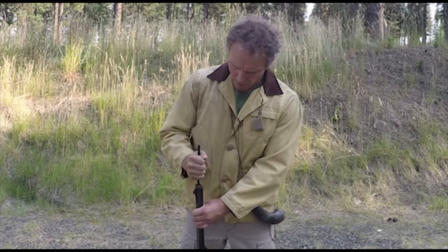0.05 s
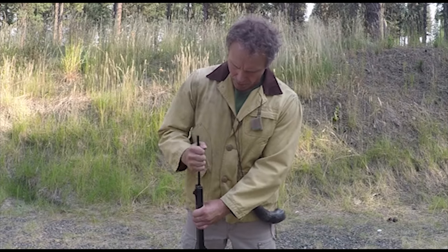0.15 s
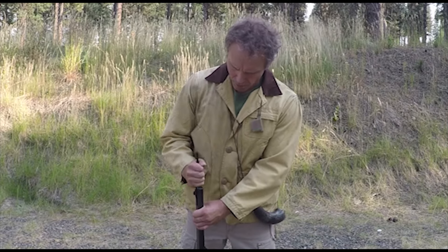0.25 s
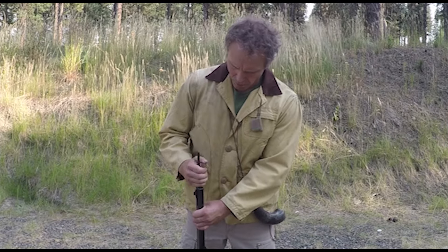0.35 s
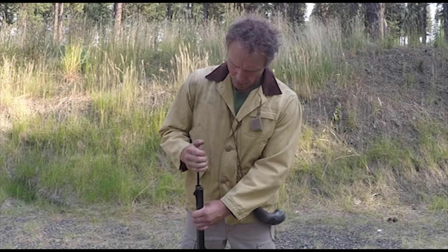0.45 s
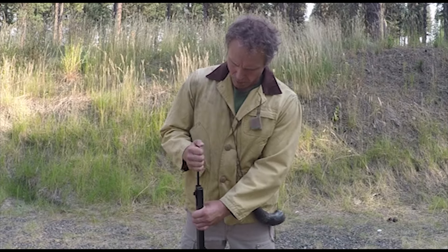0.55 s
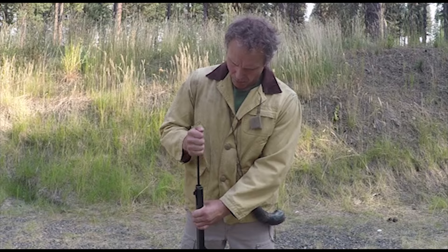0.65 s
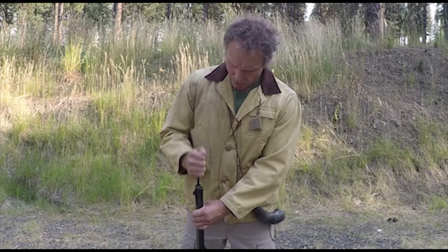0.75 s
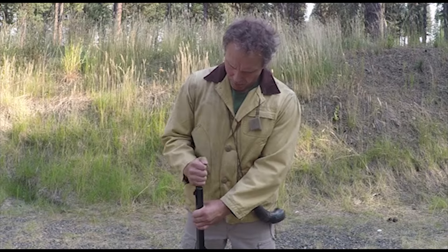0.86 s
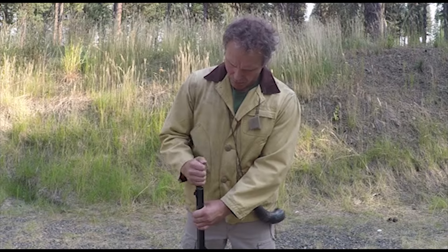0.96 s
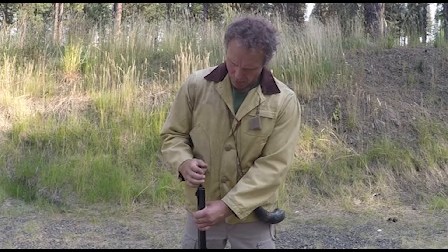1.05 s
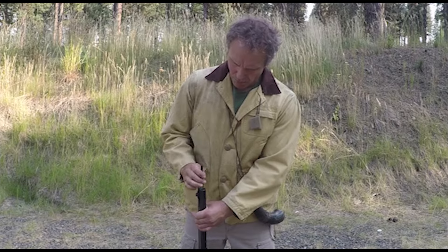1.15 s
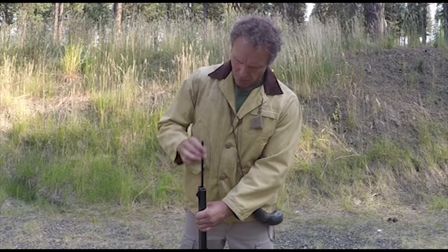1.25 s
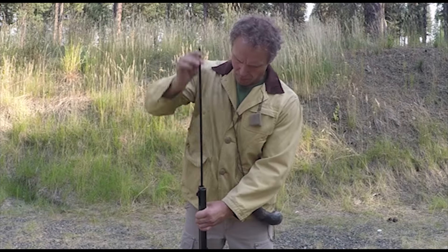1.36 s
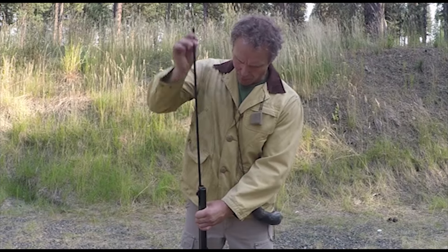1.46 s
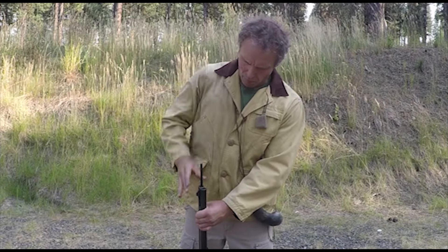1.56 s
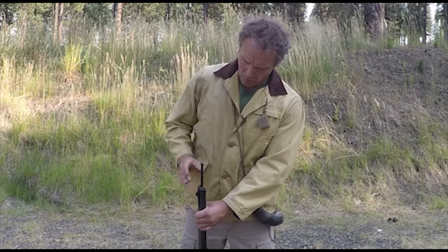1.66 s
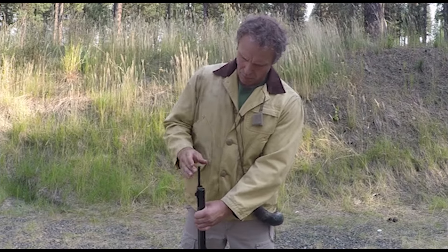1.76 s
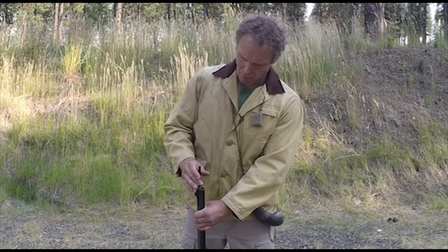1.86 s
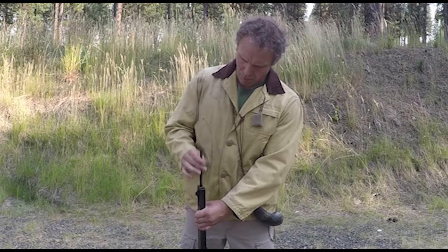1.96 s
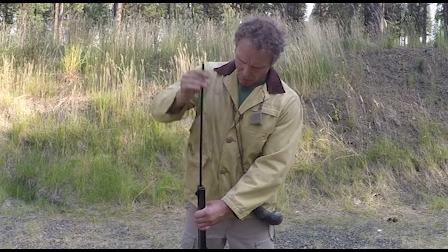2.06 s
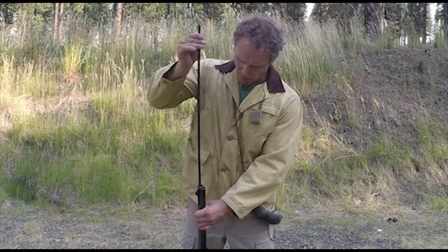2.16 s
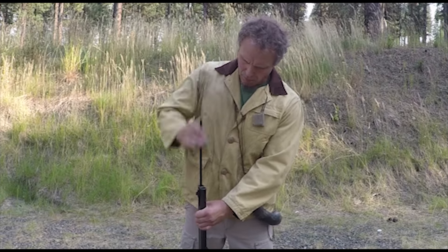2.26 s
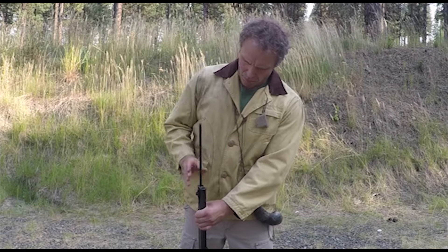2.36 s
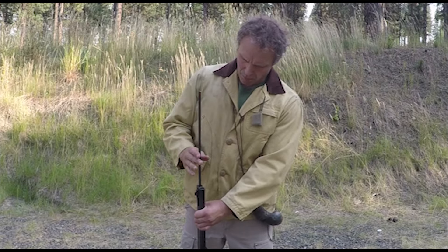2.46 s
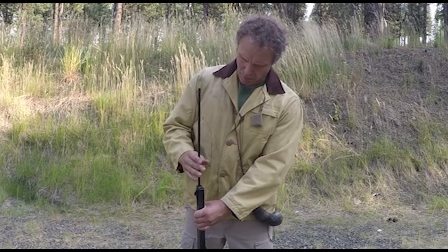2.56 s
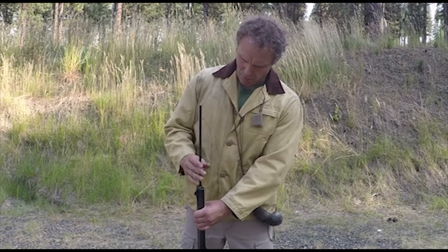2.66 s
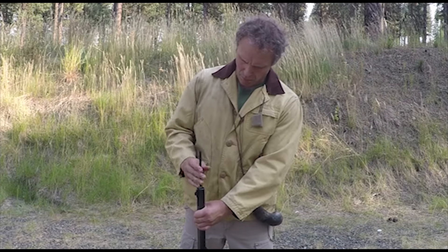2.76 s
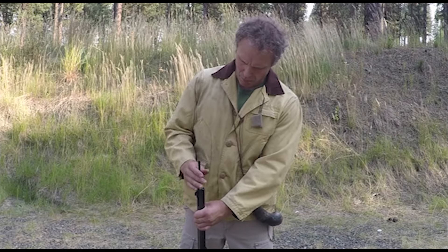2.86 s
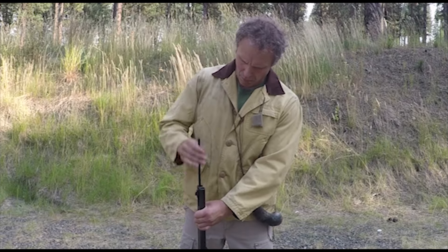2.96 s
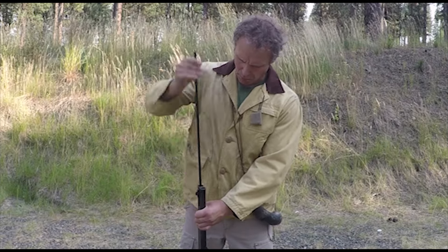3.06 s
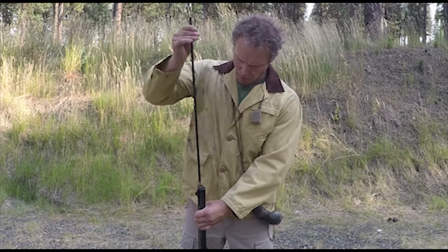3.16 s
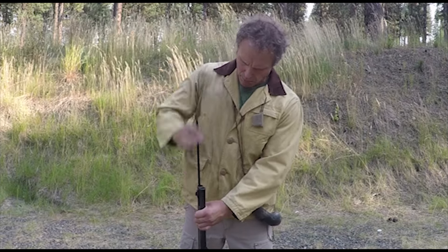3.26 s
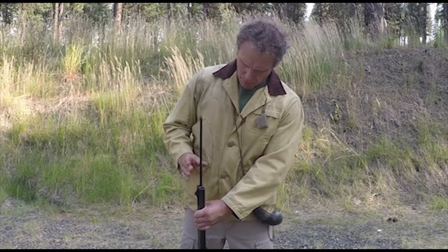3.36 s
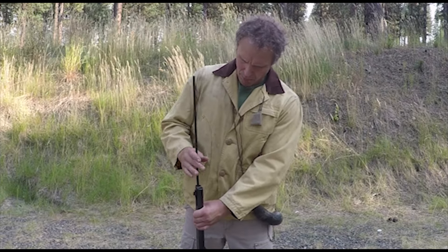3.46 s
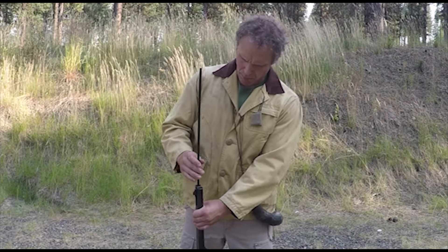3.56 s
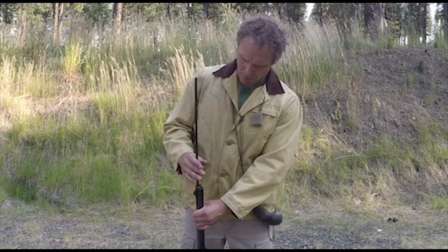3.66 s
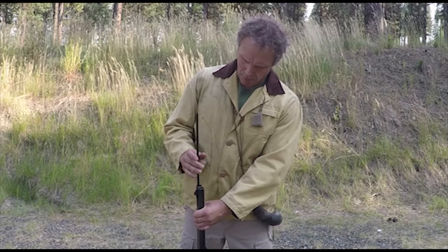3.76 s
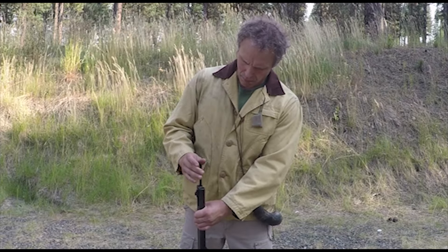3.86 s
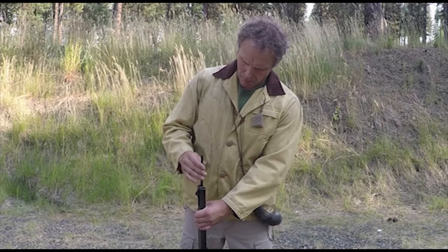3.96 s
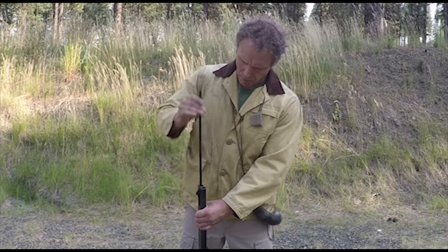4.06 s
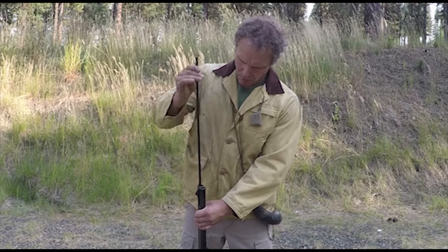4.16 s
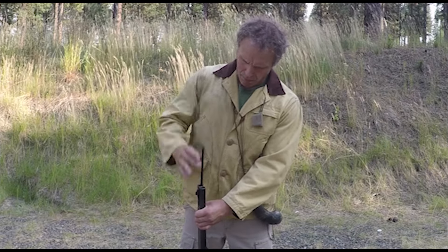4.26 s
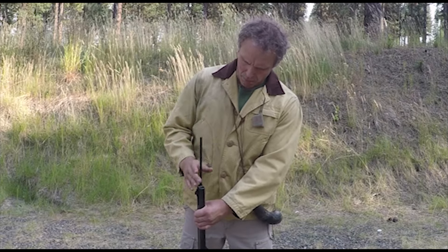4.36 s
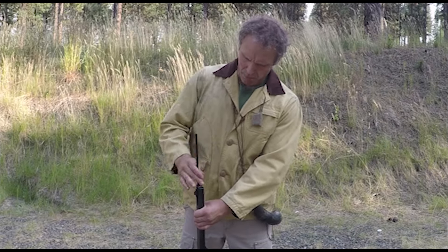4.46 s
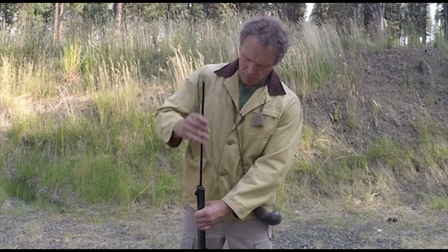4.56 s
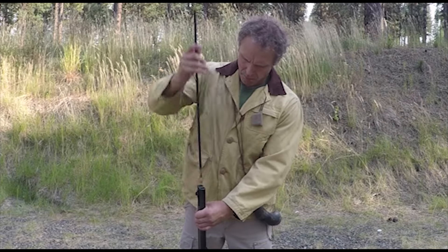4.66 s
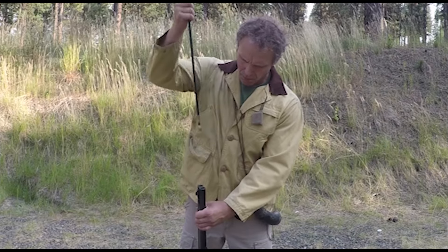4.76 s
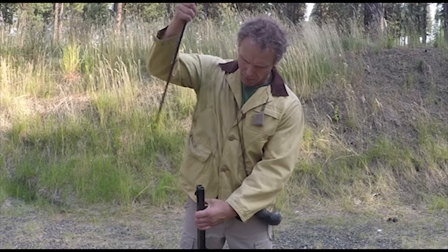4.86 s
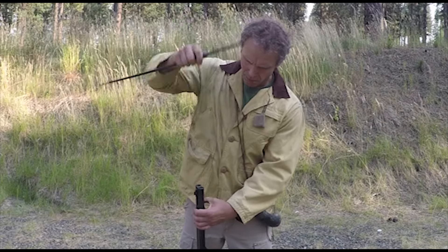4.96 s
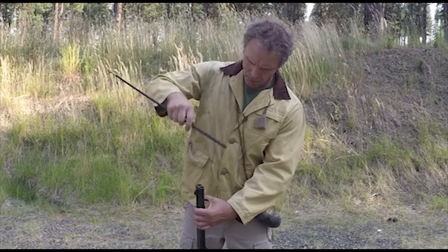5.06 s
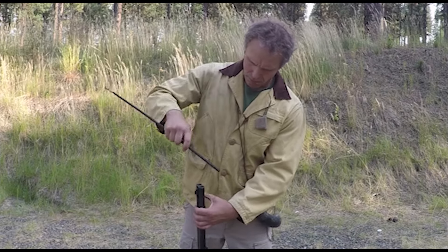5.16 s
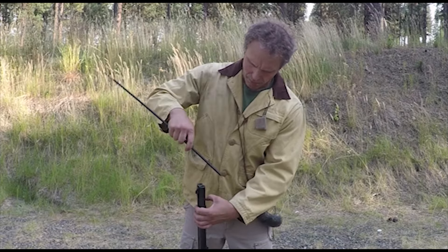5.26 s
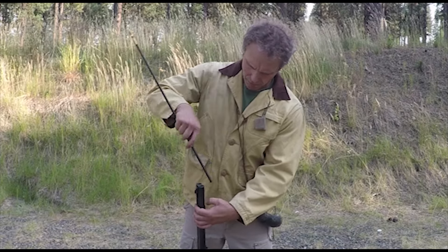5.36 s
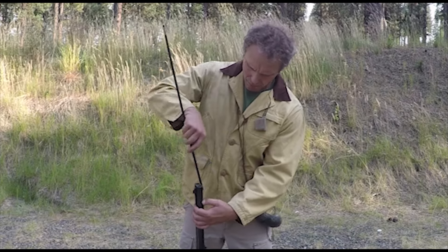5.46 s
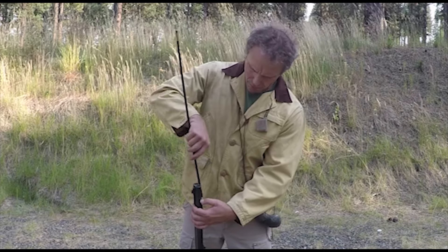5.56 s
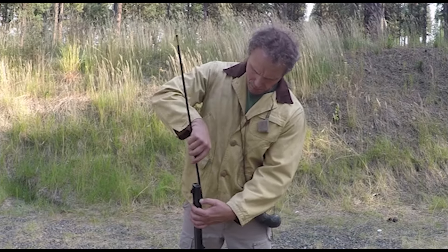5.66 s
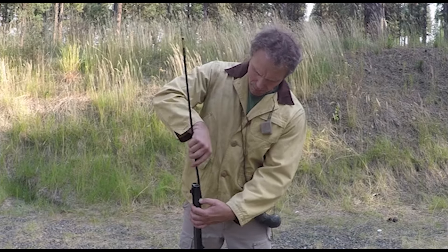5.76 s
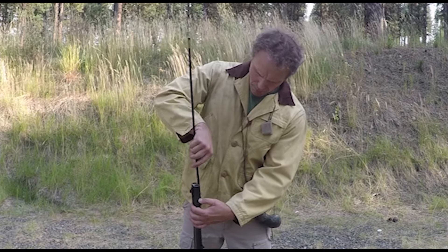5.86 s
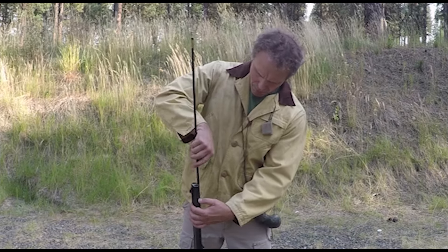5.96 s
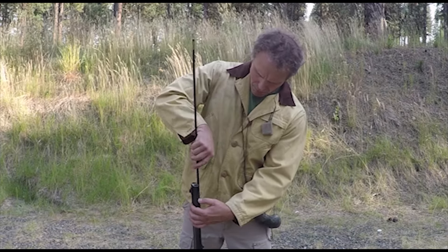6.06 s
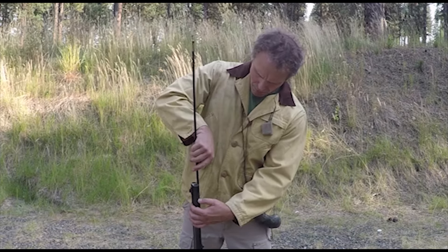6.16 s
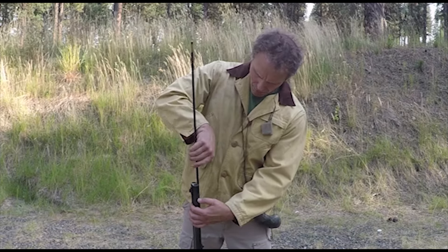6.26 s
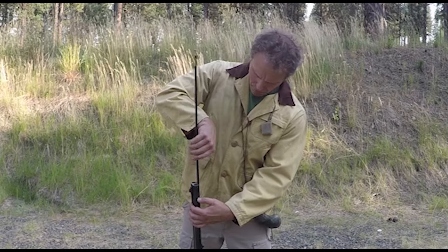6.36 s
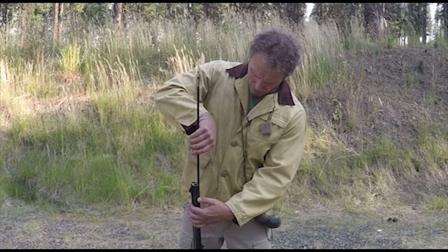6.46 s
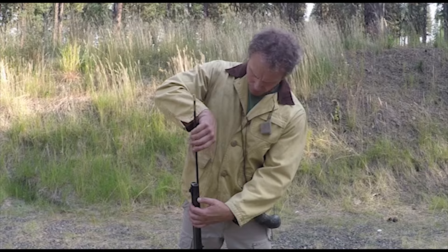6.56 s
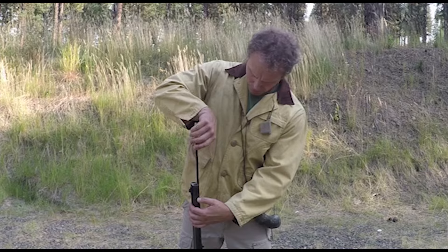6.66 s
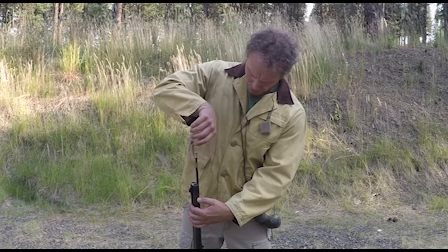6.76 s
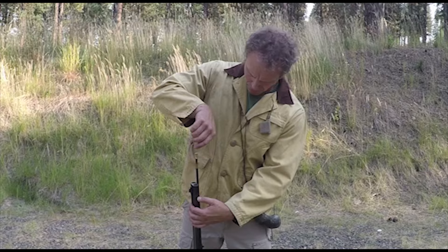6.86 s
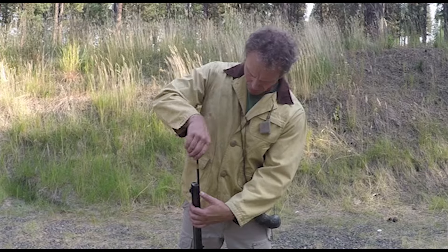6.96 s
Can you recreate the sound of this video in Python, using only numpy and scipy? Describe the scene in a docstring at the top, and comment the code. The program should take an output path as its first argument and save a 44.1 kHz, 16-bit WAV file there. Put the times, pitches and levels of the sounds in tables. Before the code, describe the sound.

Outdoors, a few steps away, a metal rod knocks three times inside a rifle barrel, the hollow tone dropping in pitch. Six sharp bouncing clacks follow, unevenly loud, each with a quick steel rattle, while the rod ticks and scrapes in between. Near the end come thin squeaks and a quick cluster of pinging knocks on the muzzle. A soft breeze rustles distant trees and rumbles lightly on the microphone.

```python
"""A steel ramrod seats a ball in a muzzle-loading rifle, outdoors in a light breeze.
Three shoves drive the ball down the bore (the hollow of the barrel), so the air in it drops in pitch.
Then the rod is thrown onto the ball six times and bounces, rattling. In between it slides and ticks
against the wall; at last it is drawn out and knocked against the muzzle (the barrel's open end).
A mode is one tone at which a thing rings; t60, or fade time, is the seconds it takes to lose 60 dB."""
import sys
import numpy as np
from scipy import signal
from scipy.fft import rfft, irfft, next_fast_len
from scipy.io import wavfile

SR = 44100
rng = np.random.default_rng(int(sys.argv[2]) if len(sys.argv) > 2 else 0)


def put_to_file(sound):
    """Save the sound as 16-bit audio at rate SR, in the file named by the first command-line argument."""
    columns = np.atleast_2d(sound).T  # one column per channel
    safe = np.clip(columns, -1, 1)
    whole_steps = np.round(safe * 32767)
    wavfile.write(sys.argv[1], SR, whole_steps.astype(np.int16))


N = 308987

# The rod lands on the ball: (time [s], crack [dB], crack fade time [s], treble [dB], bore air [dB],
# stock [dB], rod ring [dB], buzz [dB], chatter click [dB], chatter ring [dB], chatter length [s])
LANDINGS = [(0.0223, -3.5, 0.028, -8.5, -13, -22, -24.5, -25, -35, -35, 0),
            (0.29, -9, 0.045, -11.5, -35, -20, -25.5, -42, -24.5, -40, .052),
            (0.8405, -1, 0.041, -13.5, -18.5, -17.5, -34, -23, -21.5, -38, .052),
            (1.6469, -5, .067, 1.5, -7, -7.5, -19.5, -11.5, -25, -26, .158),
            (2.377, -0.5, 0.044, 2.5, -9.5, -9, -19, -24, -25.5, -31, .074),
            (2.8759, -12.5, 0.069, 1, -15, -18, -19, -28, -32.5, -41, .052),
            (3.3776, -1.5, 0.074, 1.5, -7.5, -8.5, -17.5, -18, -26, -27, .052),
            (3.9432, -10, .063, -2, -14.5, -21.5, -24, -23, -25, -31, .074),
            (4.3669, -3, 0.057, -1, -15, -14.5, -11.5, -7, -23.5, -21.5, .116)]
# The rod knocks on the muzzle:
# (time [s], crack [dB], crack fade time [s], treble [dB], rod ring [dB], favoured pitch [Hz])
MUZZLE_KNOCKS = [(6.603, -11, 0.049, 2, -18.5, 1910), (6.7353, -14.5, 0.046, -37, -23, 3000),
                 (6.7964, -3.5, 0.042, -3, -15.5, 1720)]
# The steel rod's modes: (pitch [Hz], level in the bore [dB], level outside [dB], base fade time [s])
ROD_MODES = [(1586, -5.5, -24, 0.1), (1719, -11.5, -12, 0.11), (1850, -9.5, -12.5, 0.14),
             (1872, -15, -10, 0.13), (2096, -13, -22, 0.13), (2926, -7.5, -1, 0.11), (3000, -4, -4, 0.046),
             (3670, -37, -20, 0.13), (3760, -34, -25, 0.11), (4260, -28, -12, 0.13), (4250, -8.5, -10, 0.1),
             (5200, -14, -12, 0.073), (6400, -20, -20, 0.12), (6840, -20, -25, 0.14), (7900, -29, -17, 0.2),
             (10100, -20.5, -20, 0.2), (11600, -51, -19, 0.17), (12800, -23.5, -40, 0.1),
             (12200, -43, -40, 0.087)]
# The very high zing of a bright contact: (frequency [Hz], level [dB])
ZING_SPECTRUM = [(9000, -10.5), (11300, -5), (12700, 8.5), (13500, -9), (15500, -39)]
EVENT_SIZE = SR // 4   # samples in one short sound
AGE = np.arange(EVENT_SIZE) / SR   # seconds since that sound began
LOOSE_FROM_S, LOOSE_TO_S = 1.33, 4.72   # the rod is lifted and thrown between these times


def rod_landings():
    """Each landing cracks, thumps the wooden stock, sounds the bore and leaves the rod buzzing."""
    # The stock's modes: (pitch [Hz], level [dB], fade time [s])
    stock_modes = [(80.4, -14.5, 0.23), (123.6, -24, 0.17), (208.3, -13.5, 0.12), (370, -9.5, 0.055),
                   (499, -4.5, 0.059), (546, -13.5, 0.063), (778, -15, 0.13)]
    stock = sum((-1) ** k * from_db(db) * ring(tap(), hz, t60)
                for k, (hz, db, t60) in enumerate(stock_modes))
    # The crack and the buzz: (frequency [Hz], level [dB])
    spectrum = [(40, -21), (80, 2.5), (200, 3), (280, -5.5), (490, -1.5), (920, -3.5), (1600, 1),
                (3000, -1.5), (5200, -2), (7500, -8.5), (10500, -10.5), (12500, 1), (14500, -6.5),
                (16000, -15)]
    out = np.zeros(N)
    for s, crack_db, t60, treble_db, air_db, stock_db, ring_db, buzz_db, *_ in LANDINGS:
        buzz = crack(spectrum, treble_db + 2, t60=0.11, build_s=0.0092)
        buzz *= flutter(EVENT_SIZE, per_s=390, depth_db=3.5)
        hit = crack(spectrum, treble_db, t60, build_s=0.00054)
        hit *= flutter(EVENT_SIZE, per_s=886, depth_db=5.5)
        zing = from_db(-15 + 4.7 * treble_db) * crack(ZING_SPECTRUM, 0, t60=0.035, build_s=0.0042)
        add(out, s, from_db(crack_db) * (hit + zing) + from_db(buzz_db) * buzz)
        add(out, s, from_db(air_db) * bore_air(s) + from_db(stock_db) * stock)
        add(out, s, from_db(ring_db) * rod_in_bore(tap(), treble_db, random_lean_hz()))
    return out


def bore_air(s, t60=0.076):
    """The air above the ball rings like a pipe closed at one end: the longer, the lower."""
    # The air's lowest tone as the ball goes down: (time [s], pitch [Hz])
    pitch_path = [(.022, 262), (.031, 250), (.05, 205), (.1, 190), (.3, 180), (.84, 162), (.9, 150),
                  (1.5, 148.3), (7, 148.3)]
    # Its modes with the ball seated, near odd multiples of the lowest: (pitch [Hz], level [dB])
    air_modes = [(150, -9.5), (446, -5), (741, -2), (1039, -6), (1336, -7), (1655, -9), (1948, -11),
                 (2224, -11), (2547, -5), (2853, -11), (3461, -14), (3740, -14), (4330, -16), (4960, -12),
                 (6208, -19)]
    seated_hz = 148.3
    pitch_ratio = np.interp(s + AGE, *np.transpose(pitch_path)) / seated_hz
    glide_time = np.cumsum(pitch_ratio) / SR
    moving = pitch_ratio[0] - 1
    out = 0
    for k, (hz, db) in enumerate(air_modes):
        # A ball still moving pumps the lowest mode and hardly the high ones.
        pumped_db = moving * (20 if k == 0 else 4 - 9 * abs(k - 2))
        wave = np.sin(2 * np.pi * (hz * glide_time + (k > 0) * rng.random()))
        decay = fade(t60 / pitch_ratio[0] if k else t60)
        out += from_db(db + pumped_db + scatter()) * wave * decay
    return out * (1 - np.exp(-AGE / 0.0019))


def rod_in_bore(force, treble_db, favoured_hz):
    """The rod's modes shift and fade with where it leans; the wall damps the high ones most."""
    out = 0
    for hz, db, _, t60 in ROD_MODES:
        detune = 1 + (.02 if hz < 2000 else .05) * scatter()
        damping = (1.2 + .4 * scatter()) * (hz / favoured_hz) ** .45
        tilt_db = 0.23 * treble_db * np.log2(hz / favoured_hz)
        gain = from_db(db + tilt_db + 9 * nearness(hz, favoured_hz) + 4 * scatter())
        out += gain * np.sign(scatter()) * ring(force, hz * detune, t60 / damping)
    return out


def random_lean_hz():
    """The pitch that rings best when the rod leans on the wall at a chance spot."""
    return 1774 + 170 * scatter()


def wall_clicks():
    """Steel clicks on steel inside the bore; a bright bounce also zings."""
    # The rod touches the wall, whether moved by hand, falling or bouncing: (time [s], click [dB], rod ring
    # [dB], treble [dB], favoured pitch [Hz])
    touches = [(.119, -27.5, -30, 2, 1860), (.235, -29, -37, -2, 1820), (0.248, -31.5, -34, 9.5, 1720),
               (0.5687, -28.5, -28, -15, 1720), (.66, -29.5, -26.5, -1, 1730),
               (0.684, -35, -31.5, -18, 1690), (.758, -30, -30.5, 6, 1600), (1.2334, -27, -47, -32, 1840),
               (1.5587, -31, -27, -12, 1820), (1.638, -21, -29, 0, 1840), (1.8463, -36, -35.5, -20, 1850),
               (2.028, -30.5, -34, 15, 1810), (2.076, -28.5, -34, -7, 1860), (2.1557, -36.5, -43, 13, 1620),
               (2.2838, -33, -36, -13, 1710), (2.4787, -32.5, -31.5, 0, 1860), (2.618, -35, -37, -6, 1700),
               (2.9668, -31.5, -34, -4, 1700), (3.0049, -32, -46, 8.5, 1750),
               (3.0378, -32.5, -36.5, 8.5, 1850), (3.285, -25, -38, -30, 1600), (3.3577, -39, -25, 2, 1820),
               (3.507, -28, -26, -7, 1806), (3.629, -37, -38.5, 7.5, 1610), (4.0102, -26, -25.5, -8, 1840),
               (4.0628, -36.5, -41, 13.5, 1840), (4.320, -34.5, -29.5, 1, 1850),
               (4.3478, -29, -26, 12, 1800), (4.5527, -28.5, -27.5, -1, 1790),
               (4.5784, -24.5, -26, 14, 1640), (5.647, -44, -35.5, -13, 1880), (5.798, -38, -38, -14, 1910),
               (6.859, -45, -31, -28, 1820)]
    # The click: (frequency [Hz], level [dB])
    spectrum = [(100, -7), (250, -12), (360, 11), (560, -10), (830, -9), (1150, 7.5), (1700, 3), (3000, 5),
                (5000, 3), (8000, -4), (11000, -10.5), (12800, -17), (15500, -32.5)]
    out = np.zeros(N)
    for s, click_db, ring_db, treble_db, favoured_hz in touches + chatter() + loose_ticks():
        click = crack(spectrum, .5 * treble_db, t60=0.038, build_s=0.00016)
        zing = from_db(-17 + 1.53 * treble_db) * crack(ZING_SPECTRUM, 0, t60=0.03, build_s=0.00032)
        add(out, s, from_db(click_db) * (click + zing))
        add(out, s, from_db(ring_db) * rod_in_bore(tap(), treble_db, favoured_hz))
    return out


def chatter(gap_s=.0212, jitter_s=0.0022, loss_per_slap_db=2.62):
    """Rows for wall_clicks: after landing, the rod whips from wall to wall, each slap weaker."""
    rows = []
    for s, _, _, treble_db, *_, click_db, ring_db, length in LANDINGS:
        slap_treble_db = 12 + 0.85 * treble_db   # bright landings give bright slaps
        for k in range(int(length / gap_s)):
            at = s + gap_s * (k + 1) + jitter_s * scatter()
            loss_db = loss_per_slap_db * k
            rows.append((at, click_db - loss_db, ring_db - loss_db, slap_treble_db, random_lean_hz()))
    return rows


def loose_ticks(gap_s=.09):
    """Rows for wall_clicks: the loose rod ticks faintly and unevenly as it is lifted and thrown."""
    rows = []
    for s in np.arange(LOOSE_FROM_S, LOOSE_TO_S, gap_s):
        force_db = 4 * scatter()
        at = s + .5 * gap_s * scatter()
        treble_db = 6 + 10 * scatter()
        rows.append((at, force_db - 43.5, force_db - 44.5, treble_db, random_lean_hz()))
    return rows


def muzzle_knocks(hand_damping=1.28):
    """The hand-held rod clacks on the muzzle and pings; a soft knock barely stirs the high modes."""
    # The clack: (frequency [Hz], level [dB])
    spectrum = [(100, -3), (230, -25), (360, 3), (560, -23), (830, 0.5), (1150, -4.5), (1750, -2),
                (2200, -3.5), (3200, 1.5), (5000, 0), (6500, -3), (8000, -1), (11500, -5.5), (15500, -17)]
    out = np.zeros(N)
    for s, crack_db, t60, treble_db, ring_db, favoured_hz in MUZZLE_KNOCKS:
        ping = 0
        for hz, _, db, ring_t60 in ROD_MODES:
            tilt_db = 0.47 * treble_db * hz / 8000
            gain = from_db(db + tilt_db + 7 * nearness(hz, favoured_hz) + 2 * scatter())
            ping += gain * np.sign(scatter()) * ring(tap(), hz, ring_t60 / hand_damping)
        clack = crack(spectrum, treble_db, t60, build_s=0.00087)
        add(out, s, from_db(crack_db) * clack + from_db(ring_db) * ping)
    return out


def rod_slides():
    """Gritty rubbing makes the sliding rod hiss and ring, with a thin squeak here and there."""
    # The rod slides along the steel: (start [s], length [s], hiss [dB], rod ring [dB])
    slides = [(0.03, 0.084, -26.5, -57), (0.098, 0.1, -43, -43), (1.331, 0.15, -49, -44),
              (1.557, 0.069, -46.5, -40), (2.032, .12, -43, -39), (2.271, 0.14, -53, -45),
              (2.566, 0.048, -48, -37.5), (3.048, 0.11, -54, -43), (3.285, .049, -40.5, -33),
              (4.105, .2, -51.5, -41), (4.582, .13, -38.5, -38.5), (6.42, 0.15, -51, -50.5),
              (6.63, 0.032, -41, -41)]
    # The hiss: (frequency [Hz], level [dB])
    spectrum = [(300, -18), (1200, -0.5), (2400, 5), (4300, 7.5), (7000, -0.5), (10000, -6), (15000, -15)]
    # Thin squeaks and pings: (start [s], length [s], pitch [Hz], level [dB])
    squeaks = [(0.449, 0.008, 1000, -32), (0.798, 0.043, 7260, -51), (2.585, 0.032, 7130, -48),
               (5.79, 0.034, 1300, -36.5), (5.827, 0.14, 1250, -49), (6.448, 0.034, 2720, -36),
               (6.475, 0.045, 1900, -43.5), (6.479, 0.021, 3630, -43), (6.504, .06, 2890, -45.5)]
    out = np.zeros(N)
    for s, length, hiss_db, ring_db in slides + lead_in_scrapes():
        grip = stroke(length) * flutter(EVENT_SIZE, per_s=400, depth_db=3.6)
        add(out, s, from_db(hiss_db) * grip * noise(spectrum, EVENT_SIZE))
        rubbing = grip * rng.standard_normal(EVENT_SIZE)
        ringing = rod_in_bore(rubbing, treble_db=-5, favoured_hz=random_lean_hz())
        add(out, s, from_db(ring_db - 25) * ringing)
    for s, length, hz, db in squeaks:
        squeak = rms_one(ring(rng.standard_normal(EVENT_SIZE), hz, t60=0.021))
        add(out, s, from_db(db) * stroke(length) * squeak)
    return out


def lead_in_scrapes(length_s=.02):
    """Rows for rod_slides: the rod scrapes as it speeds up just before a throw lands or it knocks."""
    return [(s - length_s, length_s, crack_db - 37, crack_db - 31)
            for s, crack_db, *_ in LANDINGS + MUZZLE_KNOCKS if s > LOOSE_FROM_S]


def crack(spectrum, treble_db, t60, build_s):
    """Countless short modes of barrel and stock swell and die together, like a burst of noise."""
    return noise(spectrum, EVENT_SIZE, treble_db) * fade(t60) * (1 - np.exp(-AGE / build_s))


def bank_echo(sound, echo_db=-27):
    """An earth bank and trees scatter back a faint, dull tail."""
    spectrum = [(100, 9.7), (3000, 3.5), (15000, 1.5)]   # (frequency [Hz], level [dB])
    tail = noise(spectrum, EVENT_SIZE, treble_db=-9) * fade(0.53) * (1 - np.exp(-AGE / 0.0033))
    return from_db(echo_db) * signal.fftconvolve(sound, tail / np.linalg.norm(tail))[:N]


def trees_and_breeze():
    """Far trees rush evenly while a restless breeze buffets the microphone."""
    # The rush of the trees: (frequency [Hz], level [dB])
    tree_spectrum = [(20, -3), (45, -4), (70, -3), (120, -10.5), (250, -12), (480, -10), (750, -14),
                     (1100, -20), (1700, -25.5), (3000, -28), (6000, -33), (10000, -38), (15000, -42)]
    # The rumble of the wind: (frequency [Hz], level [dB])
    wind_spectrum = [(12, -12.5), (27, 3), (40, -11), (60, -13.5), (100, -29.5), (200, -37.5), (600, -76)]
    # Gusts: (peak time [s], width [s], level [dB])
    gust_peaks = [(.43, .11, -23), (.82, 0.045, -34), (3.13, 0.071, -23.5), (3.4, 0.12, -29.5),
                  (5.05, 0.093, -37.5), (6.36, 0.087, -27), (6.85, 0.28, -36.5)]
    size, t = next_fast_len(N), np.arange(N) / SR
    breeze = from_db(-39) * flutter(N, per_s=4.8, depth_db=2.5)
    gusts = sum(from_db(db) * np.exp(-((t - s) / width) ** 2) for s, width, db in gust_peaks)
    trees = from_db(-40) * noise(tree_spectrum, size)[:N]
    return trees + (breeze + gusts) * noise(wind_spectrum, size)[:N]


def noise(spectrum, size, treble_db=0, shelf_hz=8000):
    """Noise shaped to a spectrum, its treble then raised or lowered."""
    hz = np.maximum(np.fft.rfftfreq(size, 1 / SR), 1)
    points_hz, points_db = np.transpose(spectrum)
    gain = rms_one(from_db(np.interp(np.log(hz), np.log(points_hz), points_db)))
    shelf = from_db(treble_db * hz ** 4 / (hz ** 4 + shelf_hz ** 4))
    return irfft(rfft(rng.standard_normal(size)) * gain * shelf, size)


def flutter(size, per_s, depth_db):
    """An uneven gain that heads for a new random value per_s times a second."""
    targets = rng.standard_normal(size)
    wander = np.interp(np.arange(size) * per_s / SR, np.arange(size), targets)
    return rms_one(from_db(depth_db * wander))


def ring(force, hz, t60):
    """One mode: a tap sets a fading sine wave ringing."""
    decay, angle = 1000 ** (-1 / (t60 * SR)), 2 * np.pi * hz / SR
    return signal.lfilter([0, np.sin(angle)], [1, -2 * decay * np.cos(angle), decay ** 2], force + 1e-18)


def nearness(hz, favoured_hz, width_hz=90):
    """1 at the favoured pitch, falling towards 0 on either side."""
    return np.exp(-((hz - favoured_hz) / width_hz) ** 2)


def tap():
    """The force of one brief contact."""
    return signal.unit_impulse(EVENT_SIZE)


def stroke(length):
    """Pressure swells and eases over one stroke, then stays at zero."""
    return np.sin(np.pi * np.minimum(AGE / length, 1))


def fade(t60):
    """The dying away after a contact."""
    return 1000 ** (-AGE / t60)


def scatter():
    """A random number between -1 and 1."""
    return rng.uniform(-1, 1)


def from_db(db):
    """Turn decibels into a gain to multiply by."""
    return 10 ** (np.asarray(db) / 20)


def rms_one(x):
    """Scale to an average strength (root mean square) of 1."""
    return x / np.sqrt(np.mean(x ** 2) + 1e-20)


def add(out, s, sound):
    """Mix a sound in, starting at s seconds."""
    at = max(int(s * SR), 0)
    out[at:at + len(sound)] += sound[:max(len(out) - at, 0)]


def scene():
    """Rifle and rod a few steps away in the open air, in mono."""
    rifle = rod_landings() + wall_clicks() + muzzle_knocks() + rod_slides()
    return (rifle + bank_echo(rifle) + trees_and_breeze())[None]


def record(dry):
    """The hardest blows overload and are clipped; the highest treble is cut."""
    clipped = np.clip(dry, -.92, .92)
    cutoff_hz = 15600
    return signal.sosfilt(signal.ellip(10, .2, 70, cutoff_hz, fs=SR, output="sos"), clipped)


dry = scene()
out = record(dry)
put_to_file(out)
```